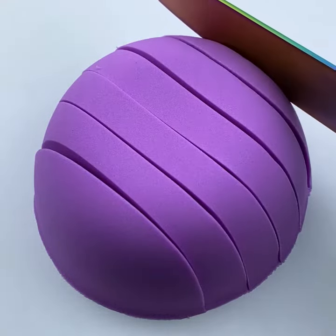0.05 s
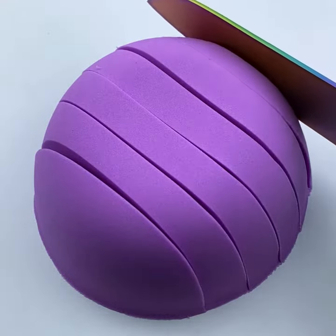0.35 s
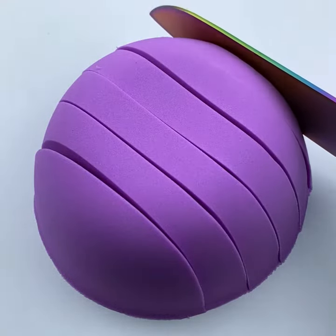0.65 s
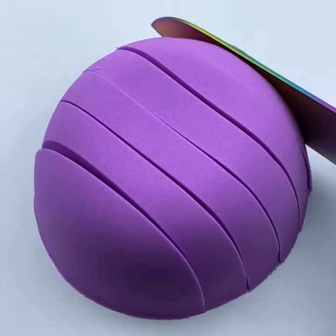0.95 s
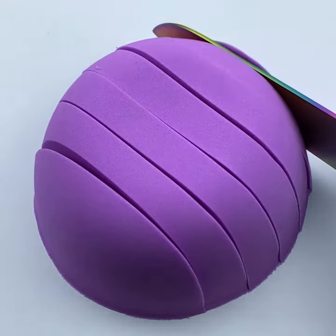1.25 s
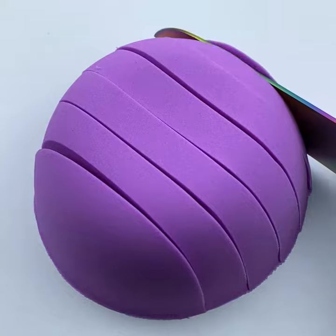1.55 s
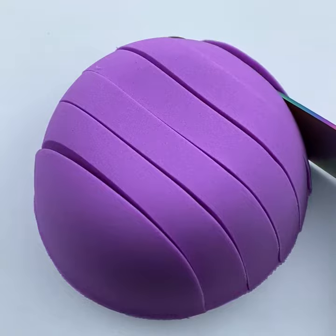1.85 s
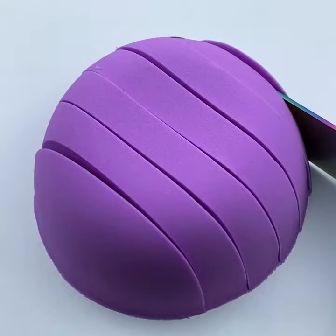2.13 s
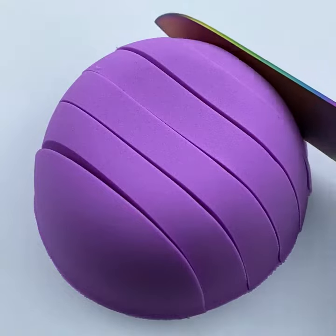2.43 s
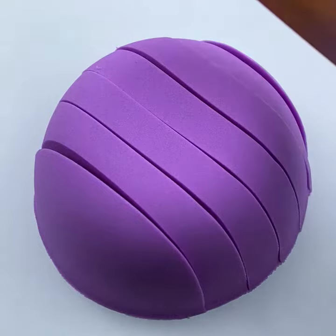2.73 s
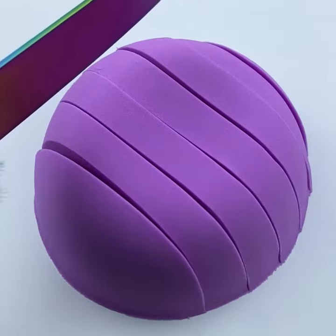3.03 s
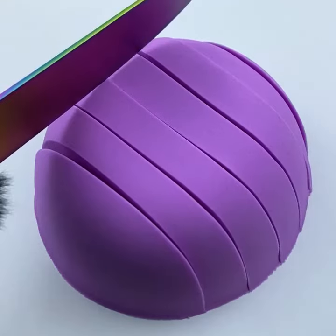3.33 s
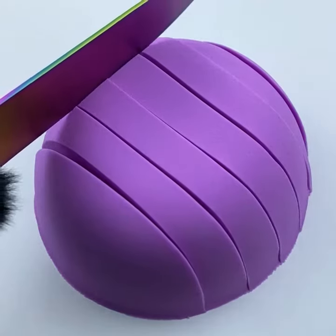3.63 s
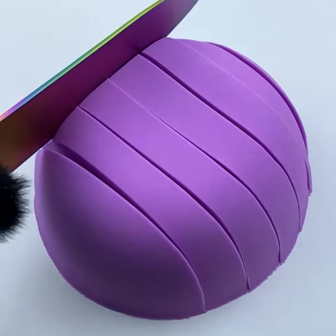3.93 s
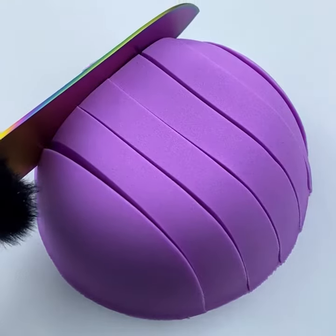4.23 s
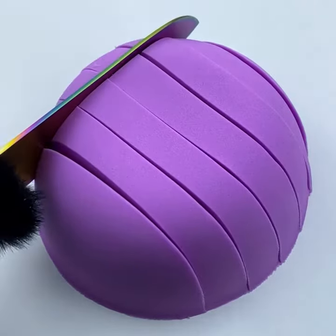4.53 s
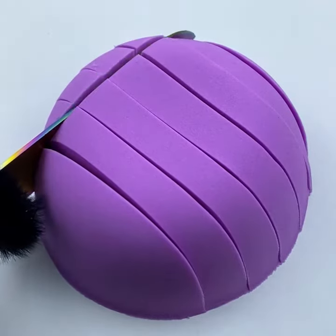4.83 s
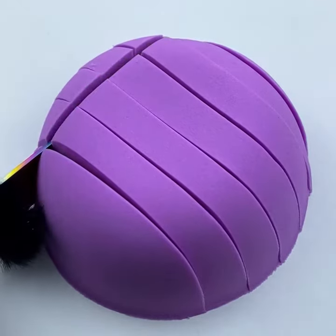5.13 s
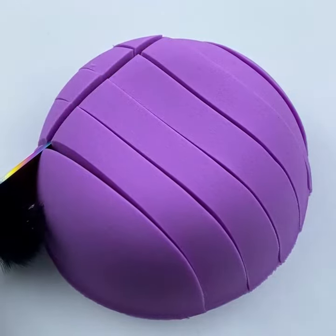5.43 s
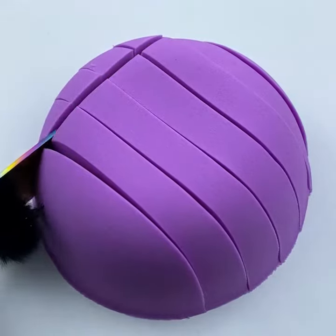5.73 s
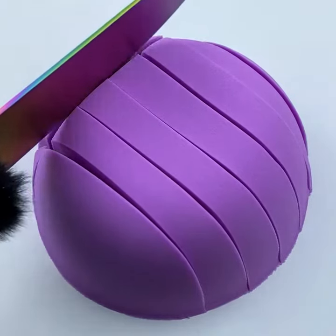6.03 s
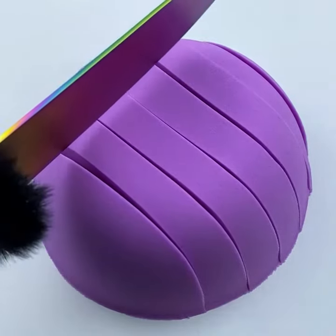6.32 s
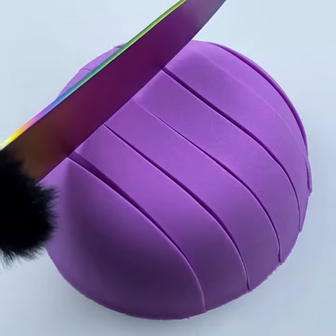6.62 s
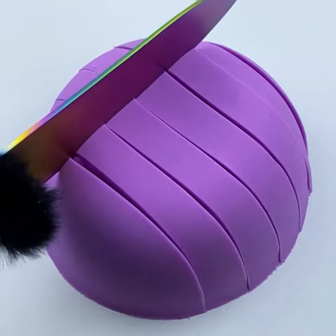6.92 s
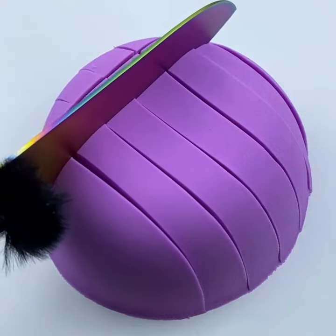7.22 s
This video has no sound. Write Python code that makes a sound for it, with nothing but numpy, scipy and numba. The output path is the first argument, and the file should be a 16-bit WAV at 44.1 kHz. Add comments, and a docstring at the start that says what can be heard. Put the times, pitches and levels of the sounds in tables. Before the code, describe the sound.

A knife slices damp, packed sand three times with a soft grainy hiss, knocking and scraping on a board after two cuts.

```python
"""A soft, grainy hiss comes first: a steel knife sinks through a dome of damp, packed sand on a board.
Grains shear past the blade and clumps crumble; after two of the three cuts the edge knocks and scrapes
on the gritty board. As the knife is drawn out, friction excites its modes, which ring more freely as
the damping by the sand falls. It then taps and grazes the dome before the next slice.
Behind it lie the low hum and rumble of a quiet room."""
import sys
import numpy as np
from scipy import signal
from scipy.fft import rfft, irfft, next_fast_len
from scipy.io import wavfile
from numba import njit

SR = 44100
rng = np.random.default_rng(int(sys.argv[2]) if len(sys.argv) > 2 else 0)


def put_to_file(sound):
    """Save the sound as 16-bit audio at rate SR, in the file named by the first command-line argument."""
    columns = np.atleast_2d(sound).T  # one column per channel
    safe = np.clip(columns, -1, 1)
    whole_steps = np.round(safe * 32767)
    wavfile.write(sys.argv[1], SR, whole_steps.astype(np.int16))


N = 320607
TIME = np.arange(N) / SR
SAND_DAMPING_HZ = 280   # bandwidth added to each blade mode per unit of depth
CUT_GRIP, TAP_GRIP = .16, .066   # sand pressing on the edge damps like this much extra depth
RIGHT_SIDE_UNTIL_S = 3   # the edge meets the board on the right, later on the left

# Levels in the tables are relative; each source applies its own gain.
# the blade sinks through the dome: start t/s, end t/s
CUT_SPANS = [(-0.1, 1.87), (3.655, 5.24), (6.71, 7.3)]
# what each cut meets: depth reached (0-1), level/dB of the crunch relative to the speed curve
CUT_DEPTHS = [(.62, -3.5), (1, -1.4), (.5, -1.5)]
# speed of the blade as a hiss level, one curve per cut: t/s, level/dB
CUT_SPEEDS = [
    [(0.0, -56), (0.098, -56), (0.108, -50.5), (0.252, -54.5), (0.998, -59.5), (1.278, -66.5),
     (1.45, -62.5), (1.532, -66), (1.86, -57)],
    [(3.68, -55.5), (3.688, -57), (3.962, -55.5), (3.98, -53), (4.326, -53), (4.436, -55.5), (4.826, -51.5),
     (5.2, -52.5)],
    [(6.72, -63.5), (6.82, -55.5), (7.26, -54)],
]
# the blade is drawn out: start t/s, free t/s
PULL_SPANS = [(2.2, 2.7), (5.6, 6.14)]
# tugs within the pulls: start t/s, end t/s, initial level/dB of steel, of hiss, of crunch
PULL_TUGS = [(2.19, 2.363, -67, -69, -74), (2.363, 2.69, -57.5, -55, -75), (5.72, 5.853, -60.5, -73, -62),
             (5.883, 6.135, -50, -59, -63.5)]
# the edge slips out of the slit: middle t/s, half length t/s, level/dB
EXIT_ZINGS = [(2.65, .04, -48.5), (2.694, 0.023, -38.5), (6.1, 0.0058, -43), (6.153, 0.015, -45.5)]
# the edge strikes the board: t/s, crack level/dB, thud level/dB, thud centre f/Hz
BOARD_KNOCKS = [(1.8945, -9, -29, 374), (1.954, -7, -22, 374), (1.9754, -9.5, -32, 369),
                (1.9946, -4, -21, 560), (1.9982, -11.5, -43, 746), (2.0101, -11.5, -39.5, 778),
                (2.019, -21, -35.5, 818), (5.2367, -14, -14.5, 524), (5.244, -5, -34, 544),
                (5.2599, -7, -32.5, 458), (5.2657, -12, -39, 1220), (5.2808, -12.5, -39, 668),
                (5.3125, 3, -21, 1080), (5.3141, -13, -24.5, 1210), (5.3939, -13, -32.5, 983),
                (5.4904, -3.5, -7.5, 966), (5.5, -20, -23.5, 984), (5.5182, -17, -26.5, 1023),
                (5.536, -11, -36.5, 1210), (5.7115, -13, -35, 765.4)]
# the edge drags grit over the board: middle t/s, half length t/s, level/dB
BOARD_SCRAPES = [(1.895, 0.0098, -36.5), (1.967, 0.015, -29), (2.008, 0.015, -29.5), (5.222, 0.012, -51.5),
                 (5.237, 0.011, -36), (5.265, 0.015, -19), (5.317, 0.011, -22.5), (5.343, 0.011, -22),
                 (5.39, .025, -55.5), (5.49, 0.012, -20), (5.511, 0.01, -22.5), (5.562, .013, -42),
                 (5.713, .014, -36)]
# the blade touches the sand or flicks free: t/s, ring level/dB, thump level/dB
SAND_TAPS = [(2.683, -31, -53), (3.4127, -33.5, -45.5), (3.508, -45, -50), (3.6257, -49.5, -48.5),
             (5.8227, -36, -43), (6.148, -46, -48.5), (6.5255, -48.5, -50.5), (6.6314, -49.5, -59.5),
             (6.662, -53, -53), (6.6938, -46.5, -59)]
# coarse grains crack under the edge: t/s, level/dB
GRAIN_SNAPS = [(3.6258, -32), (5.567, -34), (5.571, -35), (6.8758, -28), (7.0674, -29)]
# the edge grazes the surface before it bites: middle t/s, half length t/s, level/dB
EDGE_GRAZES = [(3.48, 0.028, -64), (3.57, 0.12, -59.5), (6.56, 0.047, -71), (6.675, .035, -56)]
# the blade squeaks: middle t/s, half length t/s, f/Hz, glide/(Hz/s), level/dB
BLADE_SQUEAKS = [(5.663, 0.032, 3580, -2500, -62), (5.859, 0.026, 1370, -800, -48.5),
                 (6.22, .06, 3900, -1200, -66)]
# free blade: f/Hz, bandwidth/Hz, level/dB driven on the flat, level/dB driven at the edge
BLADE_MODES = [(895, 65, -3, -4), (1375, 24, 1, 2), (1485, 18.3, 6.5, -9), (2055, 33, 5.5, -2),
               (2232, 67, 5.5, -0.5), (2660, 11, 2, -8), (2987, 32, 9.5, -14.5), (3663, 43, -6, -2),
               (4090, 45, 6, -20), (4673, 30, 10, -4), (5536, 69, 6, 3), (6030, 40, -22, -11),
               (6720, 130, -0.5, -3), (7140, 63, -9, -16.5), (7640, 40, 4.5, -8.5), (8070, 58, 2.5, -8.5),
               (8930, 18, 4.5, -13), (9390, 46, 7, 3.5), (10320, 120, -12, -3), (11030, 140, -4, -4.5),
               (11800, 82, -18, -5.5), (12900, 94, -25, -25)]
# blade pinned against the board: f/Hz, bandwidth/Hz, level/dB
PINNED_MODES = [(980, 97, -7.5), (1360, 110, -0.5), (1590, 120, -5), (1968, 230, 2.5), (2450, 140, 1.5),
                (2780, 170, 3), (3220, 120, -6), (3620, 180, 2.5), (4330, 140, -3), (4680, 180, 0.5),
                (5820, 160, -4.5), (6990, 250, 3), (8300, 170, -1), (9200, 220, -2.5), (11000, 740, -16)]
# board: f/Hz, 60 dB decay t/s, level/dB struck on the right, level/dB struck on the left
BOARD_MODES = [(110, 0.051, -5.5, -7.5), (225, 0.042, -15, -6.5), (381.7, 0.026, 1.5, -26),
               (550, 0.028, -0.5, -3.5), (793, 0.03, 8.5, -4.5), (977, 0.045, -16, 0.5),
               (1187, .03, -7.5, 1.5), (1378, 0.04, 11.5, -7.5), (1960, 0.018, -7.5, 1)]
# heavily damped dome on its board: f/Hz, bandwidth/Hz, level/dB
DOME_MODES = [(232, 81, 0.5), (400, 130, -1.5)]
# spectra of sand hissing at a shallow edge, at a deep edge and on the flat: f/Hz, level/dB
SHALLOW_SPECTRUM = [(1650, -31.5), (2800, -3.5), (3610, -6.5), (3940, -12), (4270, 1), (5560, -1),
                    (8670, -5), (11300, -4), (16000, -22.5)]
DEEP_SPECTRUM = [(1650, -42.5), (2800, -15.5), (3410, -11.5), (3830, 7.5), (6150, 0), (6820, 6), (8060, 6),
                 (15100, -17.5), (16000, -19.5)]
RUB_SPECTRUM = [(1500, -21), (4000, 3), (7500, 5.5), (8600, 5), (10800, 10), (13000, 3), (16000, -29)]
# spectra of crunching sand, shifting clumps and grit on the board: f/Hz, level/dB
CRUNCH_SPECTRUM = [(350, -34.5), (600, -19.5), (816, -4.5), (955, 3), (1280, -3.5), (1460, 4), (1950, -2.5),
                   (2240, -1.5), (3600, -7), (4680, -42), (7920, -120)]
CLUMP_SPECTRUM = [(59, -29.5), (100, 5), (161, -0.5), (201, -3.5), (385, -13.5), (661, -18.5), (800, -21),
                  (1040, -48.5), (1760, -120)]
GRIT_SPECTRUM = [(180, -50.5), (300, -18.5), (528, -9), (645, -11.5), (737, -6), (870, -10.5), (961, -18.5),
                 (1080, -18), (1190, -9), (1720, -10.5), (2000, -9), (2840, -12.5), (6300, -16.5),
                 (8220, -14.5), (16000, -29)]
# low tones in the room: f/Hz, waver rate/Hz, level/dB
HUM_TONES = [(50.7, 2.5, -47), (92.7, 4.9, -68)]
# spectra of the room's rumble and soft noise: f/Hz, level/dB
RUMBLE_SPECTRUM = [(10, -0.5), (18, -1.5), (30, -4.5), (40, -1), (55, 3), (70, -12), (90, -14)]
ROOM_SPECTRUM = [(65, -27.5), (110, 4), (120, -14.5), (197, -7), (299, -21), (463, -14.5), (571, -22.5),
                 (717, -22.5), (780, -20), (921, -24), (1180, -29.5), (16000, -48.5)]


def cutting(depth, hiss, crunch):
    """Granular friction: grains shear past the blade; sinking damps the steel and shifts the hiss."""
    slip = from_db(0.37 * drift(45))
    shallow = colour(grains(per_s=17000, spread_db=2.0), SHALLOW_SPECTRUM)
    deep = colour(grains(per_s=38000, spread_db=2.5), DEEP_SPECTRUM)
    sand = np.sqrt(1 - depth) * shallow + np.sqrt(depth) * deep
    steel = blade(grains(per_s=20000, spread_db=3.0), depth + CUT_GRIP, at_edge=True) * (1 - depth)
    # the narrowing slit beside the blade lifts a broad band that climbs with depth
    slit_hz = 4100 + 4000 * depth
    slit = unit_rms(lowpass(noise(), 650)) * np.cos(2 * np.pi * np.cumsum(slit_hz) / SR)
    body = crunch * (.5 + .5 * depth) * colour(grains(per_s=11000), CRUNCH_SPECTRUM)
    return slip * (hiss * (from_db(-1.5) * sand + steel + from_db(-6.5) * slit) + body)


def cut_gains():
    """Friction noise grows with sliding speed: the gains of hiss, crunch and crumbling."""
    hiss = crunch = crumble = 0
    usual_speed_db = -55
    for (start, end), (_, crunch_db), speed in zip(CUT_SPANS, CUT_DEPTHS, CUT_SPEEDS):
        moving = stroke(start, end)
        speed_db = np.interp(TIME, *np.transpose(speed))
        hiss += moving * from_db(speed_db - 1.67)
        crunch += moving * from_db(speed_db + crunch_db)
        crumble += moving * from_db(-52 + 0.55 * (speed_db - usual_speed_db))
    return hiss, crunch, crumble


def blade_depth():
    """Penetration, 0-1: the blade sinks ever more slowly as it meets more sand, and rises in a pull."""
    depth = 0
    for k, (deepest, _) in enumerate(CUT_DEPTHS):
        drawn_out = ramp(*PULL_SPANS[k]) if k < len(PULL_SPANS) else 0
        depth += deepest * ramp(*CUT_SPANS[k]) ** 0.91 * (1 - drawn_out)
    return np.clip(depth, 0, 1)


def blade(drive, depth, at_edge=False):
    """Modal superposition: the steel rings, and damping by the sand widens every resonance."""
    hz, width, flat_db, edge_db = np.transpose(BLADE_MODES)
    shares = from_db(edge_db if at_edge else flat_db) * np.sqrt(width)
    shares = 2 * shares / np.sqrt(np.sum(shares ** 2))
    ring = 0
    for mode_hz, free_width, share in zip(hz, width, shares):
        loss = np.pi * (free_width + SAND_DAMPING_HZ * depth) / SR
        ring += share * damped_mode(drive, 2 * np.pi * mode_hz / SR, loss)
    return ring


@njit
def damped_mode(drive, turn, loss):
    """A damped oscillator with varying loss per sample; under steady noise it keeps its power."""
    out, state, spin = np.empty(len(drive)), 0j, np.exp(1j * turn)
    for i in range(len(drive)):
        state = state * spin * (1 - loss[i]) + drive[i] * np.sqrt(loss[i]) + 1e-18
        out[i] = state.real
    return out


def crumbling(cut_push):
    """Shear failure: clumps shift in the dome with a muffled crunch, more softly during a pull."""
    clumps = colour(grains(per_s=2100, spread_db=0.5), CLUMP_SPECTRUM)
    dome = unit_rms(resonate(grains(per_s=1700, spread_db=2.5), DOME_MODES))
    push = cut_push + from_db(-58) * sum(stroke(start, free) for start, free in PULL_SPANS)
    return push * from_db(1.4 * drift(11)) * (from_db(-1) * clumps + from_db(-8) * dome)


def pulling(depth):
    """Sliding friction drives the flat; its modes sharpen as it comes free, and zings jolt the dome."""
    rub = hiss = crunch = 0
    rise_db_per_s = 22   # each tug grows louder as it speeds up
    for start, end, steel_db, hiss_db, crunch_db in PULL_TUGS:
        tug = stroke(start, end) * from_db(rise_db_per_s * (end - start) * ramp(start, end))
        rub += tug * from_db(steel_db)
        hiss += tug * from_db(hiss_db)
        crunch += tug * from_db(crunch_db)
    contact = grains(per_s=28000, spread_db=1.0)
    soft_contact = unit_rms(lowpass(contact, 4800, order=1))
    zing = swells(EXIT_ZINGS)
    steel = blade(from_db(-1.4) * rub * contact + from_db(-4) * zing * soft_contact, depth)
    loose = grains(per_s=13000)
    sand = (hiss + from_db(-14.5) * zing) * colour(loose, RUB_SPECTRUM)
    sand += crunch * colour(loose, CRUNCH_SPECTRUM)
    jolt = from_db(-12) * zing * unit_rms(resonate(loose, DOME_MODES))
    return steel + sand + jolt


def knocking():
    """Impact excitation: each blow crushes grit in a short crack and leaves the board ringing."""
    times, crack_db, thud_db, centre_hz = np.transpose(BOARD_KNOCKS)
    crush = bursts(times + .0009, crack_db, decay_s=0.00086) * np.tanh(2 * noise())
    crack = lowpass(from_db(-1) * crush + from_db(4.5) * resonate(crush, PINNED_MODES), 10500, order=3)
    thud = 0
    for hz, t60, right_db, left_db in BOARD_MODES:
        side_db = np.where(times < RIGHT_SIDE_UNTIL_S, right_db, left_db)
        # a soft blow wakes the low modes, a hard one the high modes
        hardness_db = -8.6 * np.abs(np.log2(hz / centre_hz))
        scatter_db = .9 * rng.standard_normal(len(times))
        blows = impulses(times + .0014, thud_db + side_db + hardness_db + scatter_db)
        radius, turn = from_db(-60 / (t60 * SR)), 2 * np.pi * hz / SR
        thud += signal.lfilter([0, np.sin(turn)], [1, -2 * radius * np.cos(turn), radius ** 2], blows)
    return crack + from_db(1) * thud


def scraping():
    """Forced vibration: grit rolling under the edge drives both the pinned blade and the board."""
    grit = colour(grains(per_s=12000), GRIT_SPECTRUM)
    steel = unit_rms(resonate(grains(per_s=12000, spread_db=1.1), PINNED_MODES))
    judder = grains(per_s=3300, spread_db=4.0)
    hz, t60, right_db, left_db = np.transpose(BOARD_MODES)
    width = np.log(1000) / (np.pi * t60)
    right = from_db(-8.5) * unit_rms(resonate(judder, zip(hz, width, right_db)))
    left = from_db(-10.5) * unit_rms(resonate(judder, zip(hz, width, left_db)))
    board = np.where(TIME < RIGHT_SIDE_UNTIL_S, right, left)
    drag = swells(BOARD_SCRAPES) * from_db(0.93 * drift(260))
    return drag * (from_db(-5) * grit + from_db(-6.5) * steel + board)


def tapping(depth):
    """Transient response: a light contact rings the blade and nudges the dome into a dull thump."""
    times, ring_db, thump_db = np.transpose(SAND_TAPS)
    contact = bursts(times + 0.0026, ring_db, decay_s=0.0076) * noise()
    ring = blade(lowpass(contact, 2840, order=1), depth + TAP_GRIP)
    thump = bursts(times, thump_db, decay_s=0.021) * colour(noise(), CLUMP_SPECTRUM)
    return ring + from_db(4.5) * thump


def snapping():
    """Brittle fracture: a coarse grain cracks in a very short, bright burst."""
    times, level_db = np.transpose(GRAIN_SNAPS)
    fracture = np.tanh(2 * colour(noise(), SHALLOW_SPECTRUM))
    return bursts(times + 0.0018, level_db, decay_s=0.00042) * fracture


def grazing(depth):
    """Roughness excitation: the edge scratches over surface grains and the blade rings."""
    scratch = swells(EDGE_GRAZES) * grains(per_s=5400, spread_db=4.0)
    return blade(scratch, depth + CUT_GRIP, at_edge=True)


def squeaking():
    """Stick-slip oscillation gives a thin, unsteady, sinking whistle."""
    out = 0
    for middle_s, half_s, hz, glide, db in BLADE_SQUEAKS:
        t = TIME - middle_s
        phase = 2 * np.pi * (hz * t + glide * t * t / 2) + 1.3 * drift(190)
        out += from_db(db + 2.6 * drift(120)) * np.exp(-(t / half_s) ** 2) * np.sin(phase)
    return out


def reflections(x, t60):
    """Reverberation: the walls return a dull tail that decays exponentially."""
    t = TIME[:SR // 2]
    tail = lowpass(rng.standard_normal(len(t)), 3000, order=1) * from_db(-60 * t / t60) * (t > .004)
    return signal.fftconvolve(x, tail / np.sqrt(np.sum(tail ** 2)))[:N]


def background():
    """Ambient noise: a hum wavering in amplitude and phase, a rumble and soft room noise."""
    hum = 0
    for hz, rate, db in HUM_TONES:
        amplitude = np.sqrt(2) * from_db(db + 0.91 * drift(rate))
        hum += amplitude * np.sin(2 * np.pi * hz * TIME + 1.2 * drift(rate))
    rumble = from_db(-45.5) * colour(noise(), RUMBLE_SPECTRUM)
    return hum + rumble + from_db(-55.5) * colour(noise(), ROOM_SPECTRUM)


def from_db(db):
    """Amplitude ratio of a level."""
    return 10 ** (np.asarray(db) / 20)


def unit_rms(x):
    """Normalisation to unit power."""
    return x / np.sqrt(np.mean(x ** 2) + 1e-20)


def noise():
    """White Gaussian noise."""
    return rng.standard_normal(N)


def drift(rate):
    """Random modulation through `rate` values a second; rms 1."""
    knots = rng.standard_normal(3200)
    return unit_rms(np.interp(TIME * rate, np.arange(len(knots)), knots))


def grains(per_s, spread_db=0):
    """Shot noise: random clicks, most small and a few large; rms 1."""
    sizes = from_db(spread_db * np.minimum(rng.exponential(1, N), 5)) * noise()
    return unit_rms(sizes * (rng.random(N) < per_s / SR))


def colour(x, spectrum):
    """Spectral shaping, falling 24 dB per octave beyond the ends of the table; rms 1."""
    hz, db = np.transpose(spectrum)
    size = next_fast_len(N)
    octave = np.log2(np.maximum(np.arange(size // 2 + 1) * SR / size, 1))
    beyond = np.abs(octave - np.clip(octave, np.log2(hz[0]), np.log2(hz[-1])))
    gain = from_db(np.interp(octave, np.log2(hz), db) - 24 * beyond)
    return unit_rms(irfft(rfft(x, size) * gain, size)[:N])


def resonate(x, modes):
    """Parallel resonances of alternating sign."""
    out = 0
    for k, (hz, width, db) in enumerate(modes):
        radius = np.exp(-np.pi * width / SR)
        feedforward = np.array([1, 0, -1]) * (1 - radius ** 2) / 2
        feedback = [1, -2 * radius * np.cos(2 * np.pi * hz / SR), radius ** 2]
        out += (-1) ** k * from_db(db) * signal.lfilter(feedforward, feedback, x + 1e-18)
    return out


def lowpass(x, hz, order=2):
    """Attenuation above a cutoff frequency."""
    return signal.sosfilt(signal.butter(order, hz, fs=SR, output="sos"), x + 1e-18)


def impulses(times, levels_db):
    """Ideal impacts, one sample each."""
    train = np.zeros(N)
    train[np.round(times * SR).astype(int)] = from_db(levels_db)
    return train + 1e-18


def bursts(times, levels_db, decay_s):
    """Exponential decay after each sudden contact."""
    return signal.lfilter([1], [1, -np.exp(-1 / (decay_s * SR))], impulses(times, levels_db))


def swells(rows):
    """Gaussian envelopes of brief rubs."""
    return sum(from_db(db) * np.exp(-((TIME - middle_s) / half_s) ** 2) for middle_s, half_s, db in rows)


def ramp(start, end):
    """Linear rise from 0 to 1 between two times."""
    return np.clip((TIME - start) / (end - start), 0, 1)


def stroke(start, end, attack_s=0.025, release_s=0.019):
    """Trapezoidal envelope of one movement of the hand."""
    return ramp(start, start + attack_s) * (1 - ramp(end, end + release_s))


def scene():
    """Superposition of the knife's sounds, their reflections and the background, on one channel."""
    depth = blade_depth()
    hiss, crunch, crumble = cut_gains()
    knife = grazing(depth) + cutting(depth, hiss, crunch) + crumbling(crumble) + pulling(depth)
    knife += tapping(depth) + snapping() + squeaking() + knocking() + scraping()
    return (knife + from_db(-22.5) * reflections(knife, t60=0.2) + background())[None]


def record(dry):
    """Hard limiting flattens the highest peaks; a steep low-pass removes the top of the treble."""
    treble_cut = signal.ellip(10, .1, 80, 15850, fs=SR, output="sos")
    return signal.sosfilt(treble_cut, np.clip(dry, -.88, .88))


dry = scene()
out = record(dry)
put_to_file(out)
```